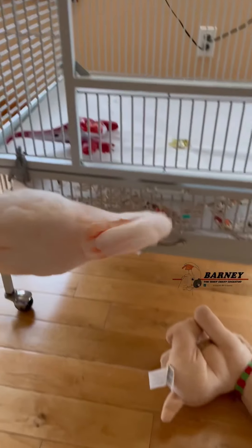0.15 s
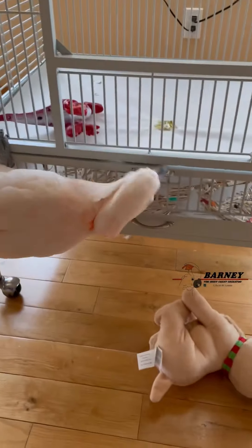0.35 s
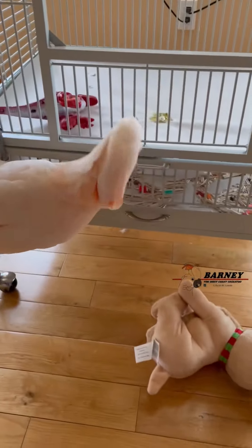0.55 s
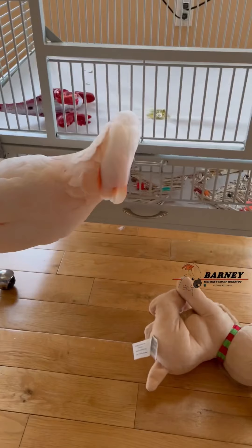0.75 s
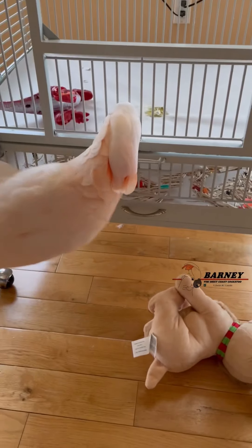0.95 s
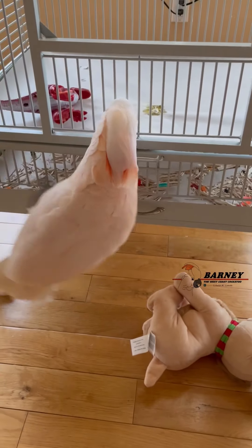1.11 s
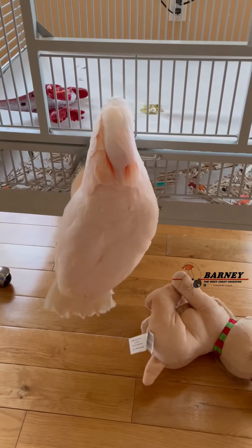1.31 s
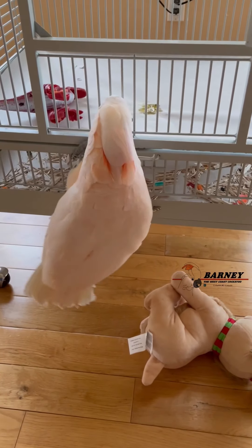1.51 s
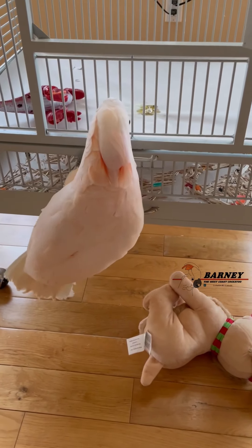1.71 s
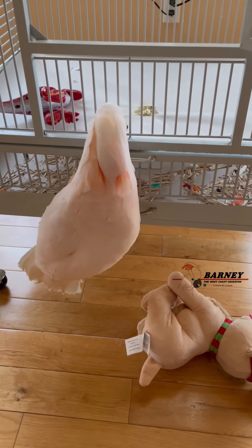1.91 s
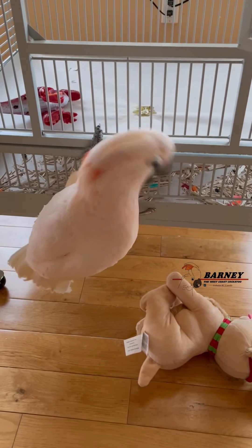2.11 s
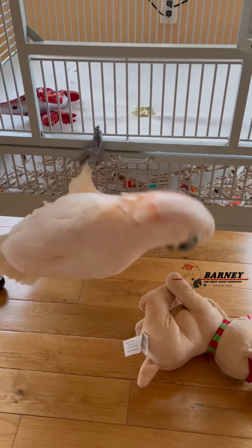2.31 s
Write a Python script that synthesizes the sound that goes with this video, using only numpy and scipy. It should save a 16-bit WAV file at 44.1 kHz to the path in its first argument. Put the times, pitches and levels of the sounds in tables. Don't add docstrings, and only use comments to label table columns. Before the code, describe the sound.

Bright clicks and ringing pings of cage wire as a parrot climbs, with dull frame knocks and soft tray thumps, busiest midway, then thinning; lively home room, faint hiss, handheld stereo phone.

```python
import sys
import numpy as np
from scipy import signal
from scipy.fft import rfft, irfft, next_fast_len
from scipy.io import wavfile

SR = 44100
rng = np.random.default_rng(int(sys.argv[2]) if len(sys.argv) > 2 else 0)


def wav_out(sig):
    wavfile.write(sys.argv[1], SR, np.round(np.clip(np.atleast_2d(sig).T, -1, 1) * 32767).astype(np.int16))


def voltage_ratio(decibels):
    exponent = np.asarray(decibels, float) / 20
    return 10 ** exponent


N = 103635

# f/Hz, level/dB, time to fade by 60 dB/s
RAIL_MODES = [(2834, 26, 0.45), (3215, 24, 0.37), (3370, 19.5, 0.14), (3630, 4, 0.15), (3570, -10, 0.29),
              (3950, -13, 1), (3985, 6.5, 0.53), (4720, -9, 0.73), (4550, -15, 1), (4660, -13, 0.42),
              (5000, 6, 0.133), (5300, -19, 0.24)]


def unit(x):
    return x / np.sqrt(np.mean(x ** 2) + 1e-20)


def along(points, hz):
    f, value = np.transpose(points)
    return np.interp(np.log(hz + 1), np.log(f + 1), value)


def filtered(x, response):
    size = next_fast_len(x.shape[-1] + 4096)
    spectrum = rfft(x, size) * response(np.fft.rfftfreq(size, 1 / SR))
    return irfft(spectrum, size)[..., :x.shape[-1]]


def resonance(width):
    def response(hz, centre):
        damping = 1j * hz * width * centre
        return (damping / (centre ** 2 - hz ** 2 + damping)) ** 2
    return response


def house():
    # f/Hz, level/dB
    rumble_colour = [(15, -34), (25, -24), (69, -9), (229, -6), (450, -16), (515, -22), (743, -25.5),
                     (2360, -39), (2500, -53), (3250, -81), (5500, -120)]
    # f/Hz, width/Hz, lift/dB
    hums = [(85, 14.1, 4.5), (118.6, 9.6, 5), (264.5, 85, 4)]
    # t/s, level/dB
    sway = [(0, -59.5), (.6, -53.5), (1.2, -54), (1.7, -59.5), (2.35, -62)]
    # f/Hz, level/dB
    hiss_colour = [(1500, 7), (2300, 1), (4000, -12), (6200, -7), (7000, -13), (8000, -11), (12500, -8),
                   (14800, -5)]

    def rumble_response(hz):
        lift = sum(db / (1 + (2 * (hz - centre) / width) ** 2) for centre, width, db in hums)
        return voltage_ratio(along(rumble_colour, hz) + lift)

    def hiss_response(hz):
        return voltage_ratio(along(hiss_colour, hz)) * (hz > 1000) * (hz < 14400)

    rumble = unit(filtered(rng.standard_normal((2, N)), rumble_response))
    s, db = np.transpose(sway)
    sway_share, sway_top_hz = 0.66, 174
    swell = voltage_ratio(sway_share * (np.interp(np.arange(N) / SR, s, db) - db.mean()))
    lows = filtered(rumble, lambda hz: 1 / (1 + (hz / sway_top_hz) ** 4))
    rumble = rumble + (swell - 1) * lows
    hiss = unit(filtered(rng.standard_normal((2, N)), hiss_response))
    mid, side = voltage_ratio(-50) * rumble + voltage_ratio(-71.5) * hiss
    side = voltage_ratio(4) * side
    return np.array([mid + side, mid - side])


def room(x):
    # f/Hz, time to fade by 60 dB/s
    fade_times = [(500, 0.52), (1300, 0.6), (3500, 0.82), (8000, 0.41), (14000, 0.3)]
    gap_s = 0.0013
    hz, t, z = signal.stft(rng.standard_normal((2, SR * 3 // 5)), SR, nperseg=256)
    fading = voltage_ratio(-60 * t / along(fade_times, hz)[:, None])
    tail = signal.istft(z * fading, SR, nperseg=256)[1]
    tail = tail * (1 - np.exp(-np.arange(tail.shape[1]) / SR / gap_s))
    return signal.fftconvolve(x[None], tail / np.linalg.norm(tail[0]), axes=1)


def contacts(rows, colour, modes, level_db, ring_db, room_db):
    rise_share, lumpy_db, longest_ring_s, scatter_db = .3, 3.5, .42, 3
    out, t = np.zeros(N + SR), np.arange(SR // 3) / SR
    hz, gain_db, t60 = np.transpose(modes)[:, :, None]
    bank = voltage_ratio(gain_db - 60 * t / np.minimum(t60, longest_ring_s)) * np.sin(2 * np.pi * hz * t)
    for s, db, centre, ms in rows:
        length = ms / 1000
        lumps = voltage_ratio(lumpy_db * np.repeat(rng.standard_normal(len(t) // 30), 30))
        shape = (1 - np.exp(-t / (rise_share * length))) * np.exp(-t / length)
        noise = rng.standard_normal(len(t)) * lumps * shape
        burst = filtered(noise, lambda f: colour(f, centre))
        burst = burst / np.linalg.norm(burst)
        struck = voltage_ratio(rng.normal(0, scatter_db, len(bank))) @ bank
        ring = signal.fftconvolve(burst[:4000], struck)[:len(t)]
        sound = burst + voltage_ratio(ring_db) * ring / np.linalg.norm(ring)
        strength = voltage_ratio(db + level_db) * np.sqrt(length * SR / 8)
        out[round(s * SR):][:len(t)] += strength * sound
    return out[:N] + voltage_ratio(room_db) * room(out[:N])[:, :N]


def singing_wires():
    # t/s, peak level/dB, pitch f/Hz, contact/ms
    pings = [(0.002, -71.5, 2370, 99), (0.227, -30, 2112, 1.7), (0.643, -36, 1854, 9.5),
             (1.330, -37, 4870, 17), (0.915, -37.5, 1416, 15), (1.120, -39, 1356, 29),
             (0.228, -32, 6240, 13), (0.228, -45, 5000, 6), (0.258, -37, 2343, 3.8),
             (0.244, -36, 1629, 12.6), (0.556, -47, 4780, 85), (0.644, -44, 4770, 35),
             (0.883, -18.5, 12970, 5.7), (0.883, -23, 7460, 3.5), (0.884, -26, 11700, 4.2),
             (1.013, -26.5, 13000, 9), (1.016, -19, 8180, 13), (1.014, -27, 6570, 11),
             (1.005, -31.5, 4655, 38), (1.039, -23, 12560, 4), (1.040, -19.5, 5850, 7.1),
             (1.042, -30, 4710, 43), (1.060, -35.5, 6560, 46), (1.060, -29, 6130, 20.3),
             (1.170, -40, 4700, 21), (1.300, -36.5, 4806, 31), (1.300, -44.5, 3737, 58),
             (1.530, -44.5, 3500, 18), (1.570, -47, 6500, 9), (1.628, -41.5, 3296, 9.3)]
    return contacts(pings, resonance(.025), RAIL_MODES, level_db=1.5, ring_db=-17, room_db=-5)


def wire_rattles():
    # t/s, peak level/dB, centre f/Hz, contact/ms
    rattles = [(0.227, -23.5, 6460, 6), (0.232, -25.5, 8310, 8.2), (0.552, -36.5, 9000, 6.4),
               (0.552, -40, 3640, 9.5), (0.642, -27, 8460, 7.1), (0.826, -25.5, 10050, 5),
               (0.093, -63, 4000, 1.7), (0.882, -15, 8470, 3), (0.882, -20.5, 13000, 3.9),
               (0.960, -39, 8900, 35), (0.994, -30, 7700, 17), (1.006, -26.5, 8800, 14),
               (1.016, -16.5, 8700, 7), (1.016, -31, 14000, 9.1), (1.045, -26.5, 14700, 13),
               (1.039, -21, 11100, 10.4), (1.040, -25, 6370, 14), (1.065, -37, 8400, 17),
               (1.145, -35.5, 6760, 22), (1.300, -28, 8900, 11.7), (1.627, -30, 6830, 3.1),
               (1.366, -26, 10600, 5.7), (1.385, -34.5, 7750, 11), (1.525, -48, 11100, 30),
               (1.542, -34.5, 10300, 9.7), (1.570, -35.5, 7250, 8.3), (1.572, -43, 12500, 8.2),
               (1.627, -32.5, 10500, 2.6), (1.802, -41, 8900, 10.5), (1.640, -47, 5300, 20),
               (1.898, -22, 10000, 4.55), (2.329, -35, 10200, 7.2), (2.329, -43, 5770, 25),
               (1.899, -33.5, 5250, 4.8)]
    # f/Hz, level/dB, time to fade by 60 dB/s
    wire_modes = [(5850, 0, .2), (5914, -4, .35), (6179, -5, .35), (6581, -4, .42), (6653, -4, .4),
                  (7280, -4, .2), (7600, -4, .2), (7948, -4, .25), (8350, -5, .2), (11920, -8, .12),
                  (12829, -6, .15)]
    # f/Hz, level/dB
    rattle_colour = [(3500, 5), (5500, -0.5), (8500, -2), (11000, 2.5), (13000, -7), (14300, -2.5),
                     (15500, -8)]
    broad = resonance(.6)

    def colour(hz, centre):
        return voltage_ratio(along(rattle_colour, hz)) * broad(hz, centre)

    return contacts(rattles, colour, wire_modes, level_db=2, ring_db=-17, room_db=2)


def frame_knocks():
    # t/s, peak level/dB, centre f/Hz, contact/ms
    knocks = [(0.218, -39, 2430, 2.8), (0.227, -16, 2260, 1.02), (0.258, -49, 2330, 1.7),
              (0.553, -30, 1580, 1.8), (0.642, -21, 1920, 2.03), (0.882, -41.5, 1140, 19),
              (0.915, -35.5, 1430, 24), (1.035, -39, 1800, 30), (1.110, -36.5, 1300, 18),
              (1.158, -40, 1300, 13), (1.375, -41.5, 2290, 20), (1.627, -39, 1940, 2.6),
              (1.640, -43, 1430, 5), (1.898, -46, 1780, 19)]
    # f/Hz, level/dB, time to fade by 60 dB/s
    frame_modes = [(1094, 14.5, 0.42), (1300, -10, 0.1), (1396, 20, 0.26), (1620, 10.5, 0.57),
                   (1800, -7, 0.6), (2080, 3, 0.05), (2480, -13, 0.22)]
    return contacts(knocks, resonance(.9), frame_modes, level_db=1.5, ring_db=-12, room_db=3.5)


def tray_thumps():
    # t/s, peak level/dB, centre f/Hz, contact/ms
    thumps = [(0.228, -33, 950, 8), (0.553, -33.5, 575, 1.55), (0.642, -26.5, 700, 3.9),
              (0.912, -35, 487, 11.7), (1.111, -39, 530, 10.3), (1.160, -40.5, 620, 14),
              (0.300, -45.5, 865, 70), (0.700, -48.5, 780, 100)]
    # f/Hz, level/dB, time to fade by 60 dB/s
    tray_modes = [(494, 15, 0.77), (620, 18, 0.083), (790, 3, 0.33), (896, 4, 0.44)]
    return contacts(thumps, resonance(.8), tray_modes, level_db=0.5, ring_db=-13.5, room_db=4)


def rail_plucks():
    # t/s, peak level/dB, centre f/Hz, contact/ms
    plucks = [(0.228, -35, 3020, 21), (0.274, -32, 3950, 10), (0.552, -56, 3040, 16),
              (0.556, -41, 4840, 16), (0.643, -33.5, 5060, 12), (0.827, -32.5, 4470, 7.4),
              (0.900, -34.5, 4530, 16), (1.006, -26, 4590, 30), (1.010, -37, 2990, 37),
              (1.041, -23.5, 5000, 6.4), (1.060, -34, 3230, 6.7), (1.134, -42, 3200, 15),
              (1.300, -35, 4730, 13), (1.385, -42, 4250, 25), (1.530, -41.5, 3630, 35),
              (1.568, -37.5, 4250, 17), (1.627, -38, 3370, 10.7), (1.801, -49, 4540, 20),
              (1.899, -40, 3360, 9.9), (2.329, -53.5, 3580, 15)]
    return contacts(plucks, resonance(.15), RAIL_MODES, level_db=1.5, ring_db=-8, room_db=-4)


def scene():
    return house() + singing_wires() + wire_rattles() + frame_knocks() + tray_thumps() + rail_plucks()


def thinned(x):
    thin_from_hz, thin_db, jump_db = 8100, -13, 5
    hz, t, z = signal.stft(x, SR, nperseg=2048, window="cosine")
    bands = np.abs(z[:-1].reshape(32, 32, -1) ** 2).mean(axis=1)
    power = np.repeat(bands, 32, axis=0)
    rest = power[(hz[:-1] > 5000) & (hz[:-1] < 14000)].mean(axis=0)
    steady = rest < voltage_ratio(2 * jump_db) * np.roll(rest, 1)
    faint = power < voltage_ratio(2 * thin_db) * rest
    z[:-1] *= ~(faint & steady & (hz[:-1, None] > thin_from_hz))
    return signal.istft(z, SR, nperseg=2048, window="cosine")[1][:N]


def top_cut(x):
    return signal.sosfilt(signal.butter(12, 16970, fs=SR, output="sos"), x)


def record(dry):
    # f/Hz, share
    apart = [(60, 0.013), (330, 0.062), (750, 0.67), (1800, 0.092), (2700, 0.76), (5200, 0.44),
             (9300, 0.45), (12000, 0.58), (13800, 0.037)]
    # f/Hz, phase/radians
    lead = [(0, 0), (950, -.4), (2000, 0), (3800, -1.1), (4500, -2.6), (5600, .4), (8500, 2.5), (9400, 3.1),
            (10600, 3.5), (13500, 6.28)]
    # f/Hz, level/dB
    louder = [(50, .2), (300, 2.2), (600, 5.5), (1100, 4.5), (1700, 0), (8000, 0)]
    # f/Hz, level/dB
    shared_dip = [(8200, 0), (8900, -10), (9500, -18), (10600, -13), (11400, 0)]

    def ports(hz):
        f, turn = np.transpose(lead)
        left = np.exp(1j * np.interp(hz, f, turn) / 2) * voltage_ratio(along(louder, hz) / 2)
        top = 1 / (1 + (hz / 16000) ** 120)
        return np.array([left, 1 / left]) * top

    mid = (dry[0] + dry[1]) / 2
    side = filtered((dry[0] - dry[1]) / 2, lambda hz: along(apart, hz))
    pair = filtered(np.array([mid + side, mid - side]), ports)
    shared = (pair[0] + pair[1]) / 2
    pair = pair - shared + thinned(filtered(shared, lambda hz: voltage_ratio(along(shared_dip, hz))))
    return top_cut(pair)


dry = scene()
out = record(dry)
wav_out(out)
```